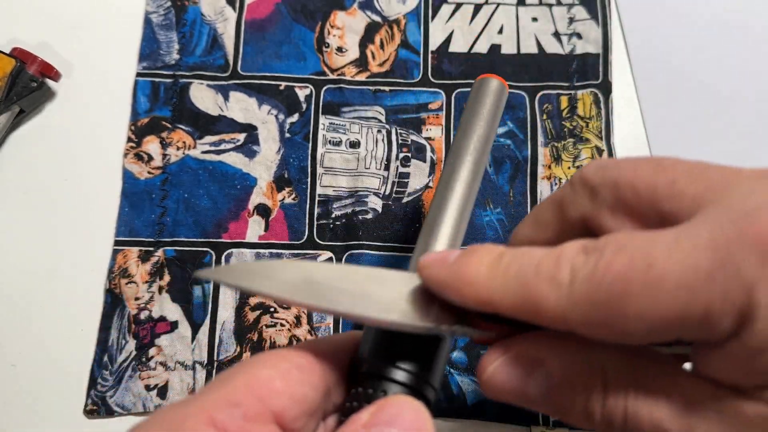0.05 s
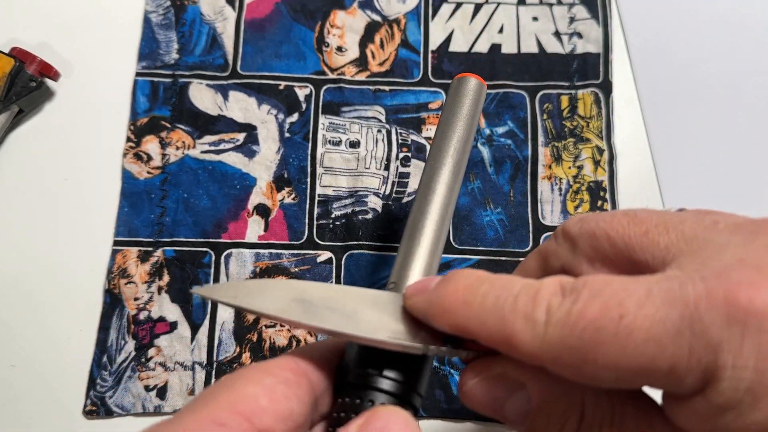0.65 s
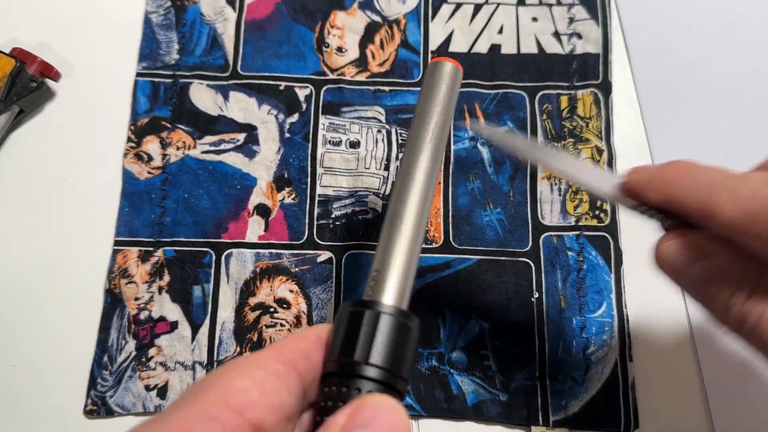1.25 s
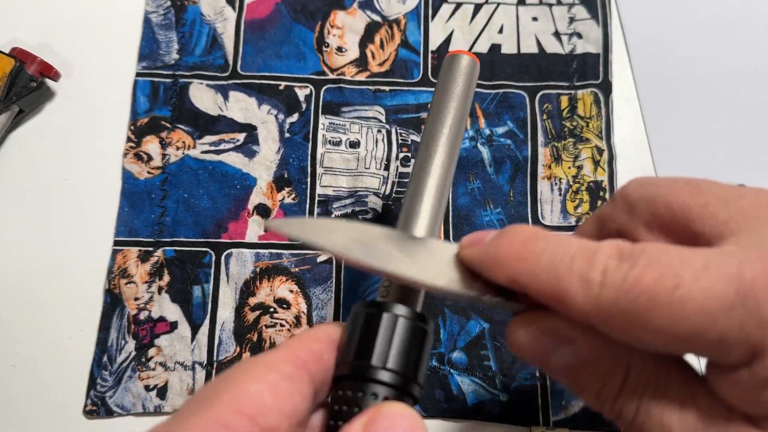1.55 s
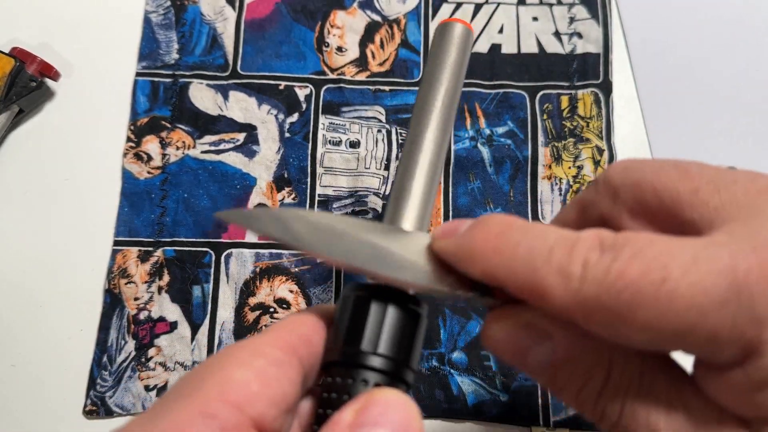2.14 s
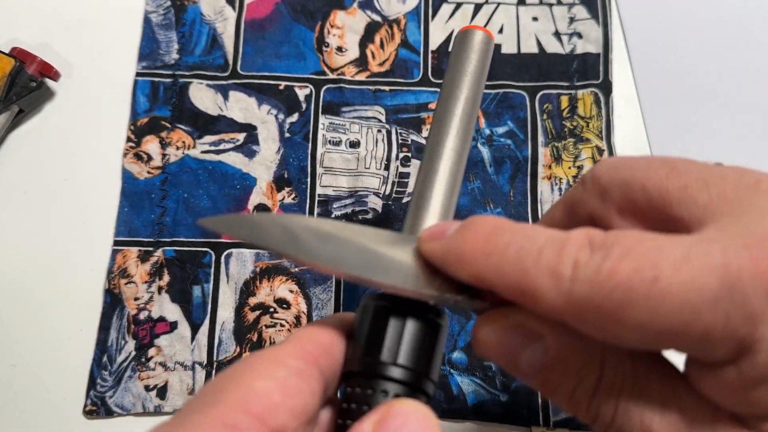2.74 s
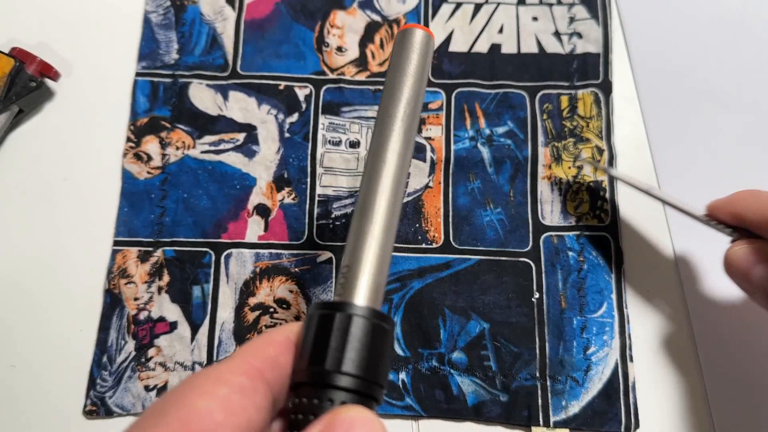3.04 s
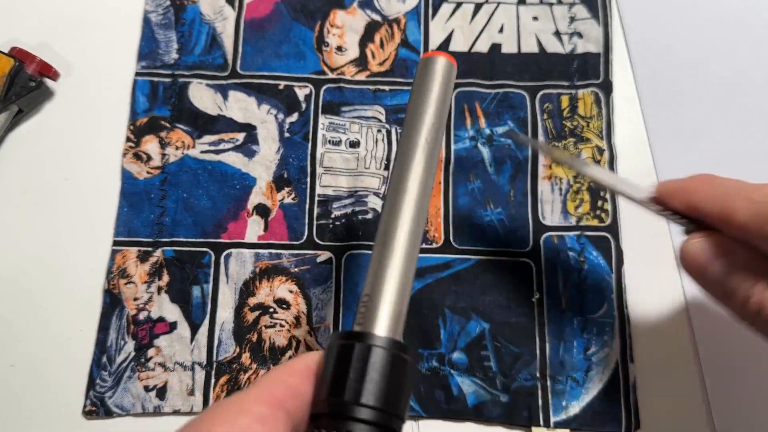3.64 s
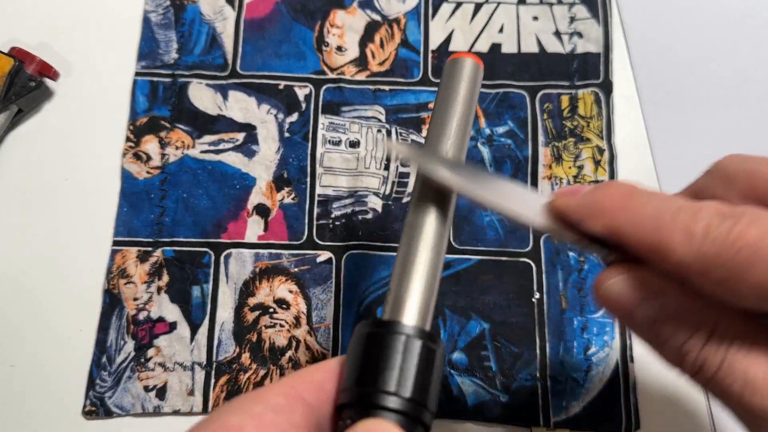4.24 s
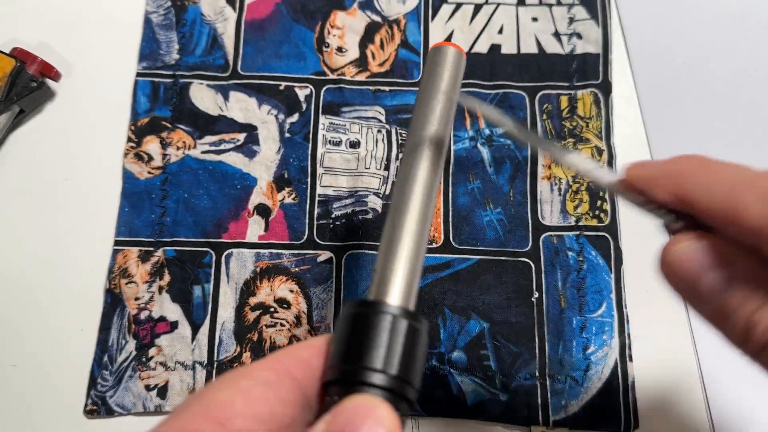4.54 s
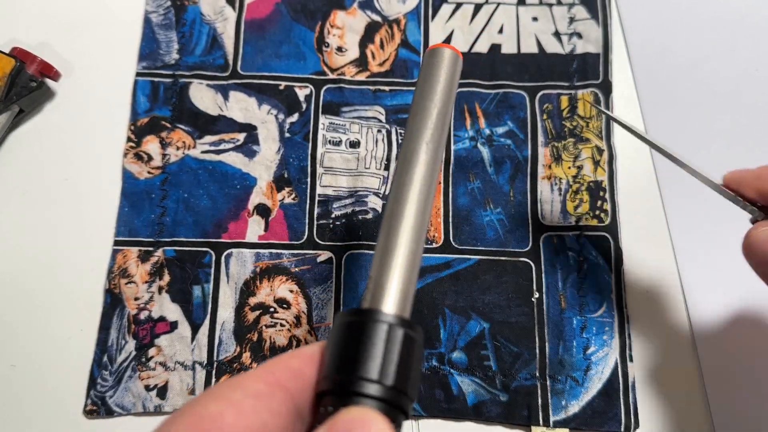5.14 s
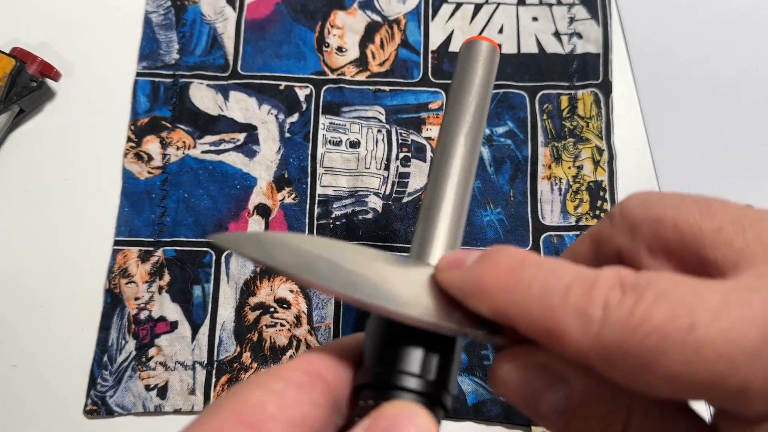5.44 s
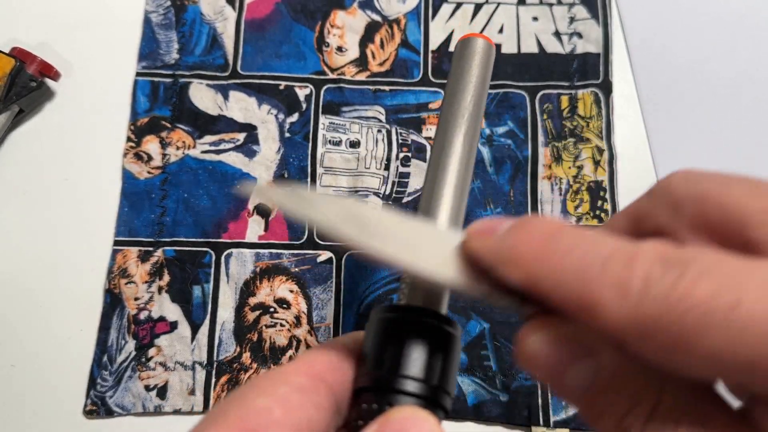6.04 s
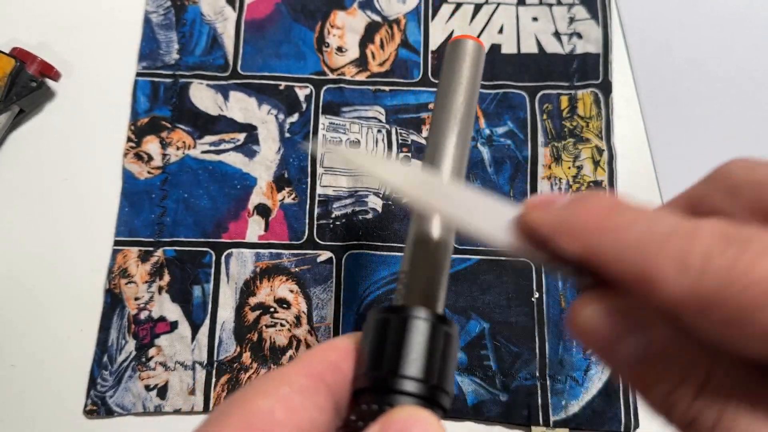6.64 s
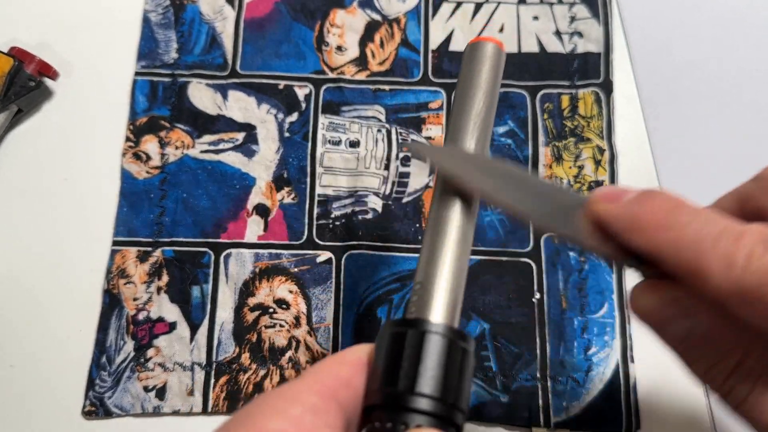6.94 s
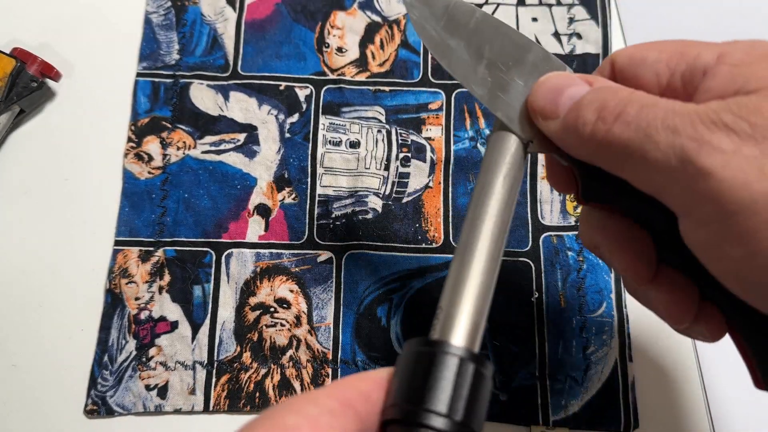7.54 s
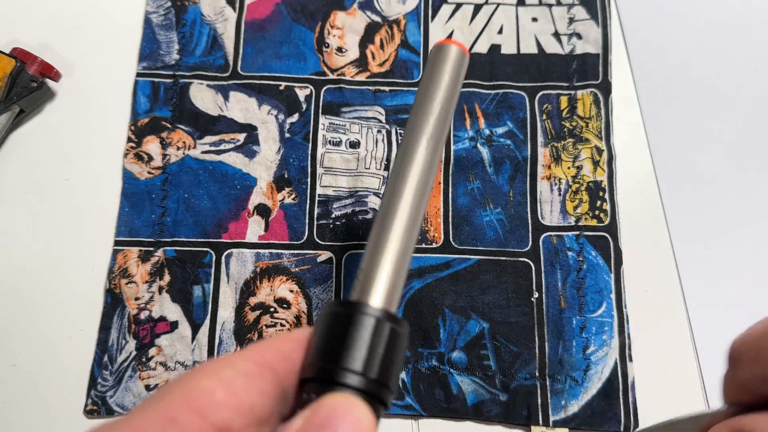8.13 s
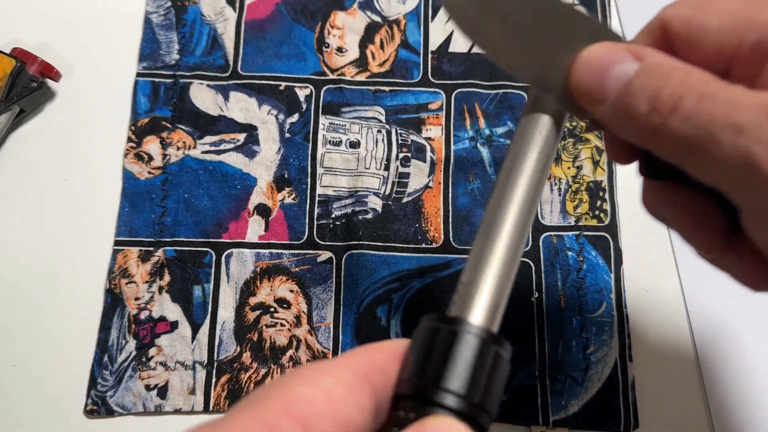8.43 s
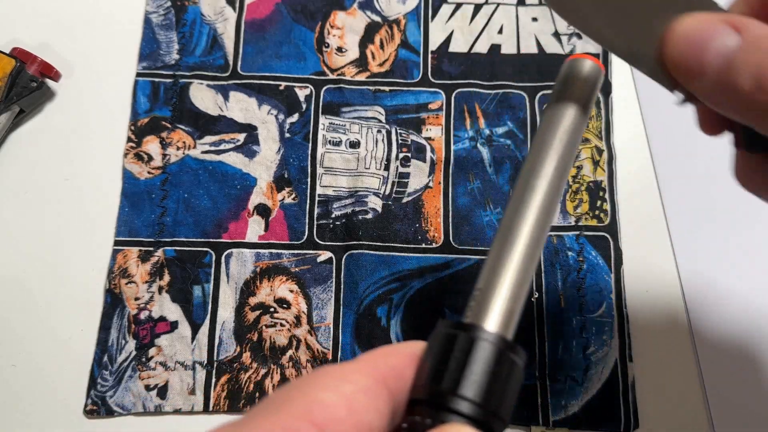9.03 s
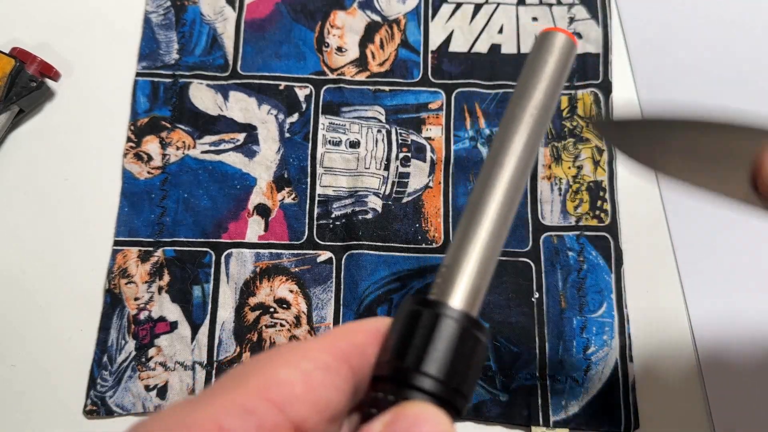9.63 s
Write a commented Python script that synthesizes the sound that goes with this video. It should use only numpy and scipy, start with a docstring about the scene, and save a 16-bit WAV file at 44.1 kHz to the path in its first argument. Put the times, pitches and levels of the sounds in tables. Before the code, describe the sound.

A knife is sharpened on a hand-held diamond rod, heard up close in a small workshop with very little echo. Light steel taps and scuffs sound at about 0.1 and 0.4 seconds. From 0.8 to 7 seconds come ten quick strokes, roughly two thirds of a second apart and each about a quarter of a second long. Each is a dry, gritty rasp that swells and brightens, with shifting metallic tones, ending in a small click and brief ring. Many begin with a tap, the sharpest at 4.7 seconds. At 7.5 seconds the blade lands with a clack and scuffs lightly. Three flatter strokes, slightly louder and hollower in tone, follow at about 7.8, 8.5 and 9.2 seconds, the last ending near 9.5. Throughout, faint sleeve rustle, low handling rumble, electrical hum and quiet room air lie underneath.

```python
"""A knife is sharpened on a hand-held diamond rod, heard up close in a small workshop.
In each stroke the rod's grit rattles the blade, whose ringing tones swell and fade as the contact
slides from heel (the handle end) to tip. Ten strokes use an upright grip, the last three a flatter one.
The blade often lands with a tap or a scuff, and its tip clicks as it leaves the rod.
Underneath are rustling sleeves, the rumble of hands, mains hum and quiet room air."""
import sys
import numpy as np
from scipy import signal
from scipy.fft import rfft, irfft, next_fast_len
from scipy.io import wavfile
from scipy.ndimage import map_coordinates

SR = 44100
rng = np.random.default_rng(int(sys.argv[2]) if len(sys.argv) > 2 else 0)


def wav_out(sig):
    """Save sig, one row per channel (or a flat mono array), as 16-bit PCM at SR to the path in sys.argv[1]."""
    wavfile.write(sys.argv[1], SR, np.round(np.clip(np.atleast_2d(sig).T, -1, 1) * 32767).astype(np.int16))


N = 431298

# The strokes in each grip. Each row: start in seconds, lift-off in seconds, rasp level in dB,
# how much softer it starts in dB, seconds to settle, treble share in dB, last push in dB,
# hand rumble in dB, tip click in dB.
UPRIGHT_STROKES = [ (0.809, 1.099, -35.5, 22, 0.064, -5, 0.5, -73.5, -45),
                   (1.52, 1.72, -34, 23, 0.091, -5, 1, -66, -47),
                   (2.115, 2.344, -34.5, 12, 0.14, -5.5, 4, -64, -48),
                   (2.754, 2.975, -36, 8.5, 0.16, -5.5, 3.5, -64.5, -30),
                   (3.42, 3.637, -35, 17, 0.12, -6, 2, -70, -33),
                   (4.049, 4.3056, -33, 21, 0.2, -5, -3, -58.5, -23),
                   (4.772, 5.018, -35.5, 6.5, .16, -5, 3.5, -59.5, -32),
                   (5.432, 5.713, -36.5, 18, 0.11, -4.5, 4, -60, -35),
                   (6.135, 6.358, -34.5, 21, 0.12, -5, -1, -58.5, -35),
                   (6.749, 7.0025, -30, 17.5, 0.27, -2.5, -3, -63.5, -26), ]
FLAT_STROKES = [ (7.816, 8.0808, -32, 27, 0.13, -6, 0.5, -60, -27),
                (8.495, 8.773, -30, 20.7, 0.11, -5.5, -7.5, -50.5, -32),
                (9.184, 9.473, -31, 18, 0.14, -5, -9, -64.5, -35.5), ]


def strokes(rows, flat, brighten_db, fade_s, tremor_db=0.58, touch_s=0.0047):
    """The edge slides from heel to tip, growing brighter, then lifts and the blade dies away."""
    out = np.zeros(N)
    for row in rows:
        start, end = row[:2]
        t = np.arange(start, end + fade_s, 1 / SR)
        place, db, treble_db = stroke_force(row, t)
        lift_db = 60 * np.maximum(t - end, 0) / fade_s
        pressure = amp(db + tremor_db * wobble(45, len(t)) - lift_db)
        soft_touch = 1 - np.exp(-(t - start) / touch_s)
        rasp = blade(grit(len(t)), place, treble_db + brighten_db * (place - .5), flat)
        add(out, start, soft_touch * pressure * rasp)
    return out


# Moments when the edge bites harder. Each row: time in seconds, extra rasp in dB, treble change in dB.
CATCHES = [(0.988, 6.5, -4.5), (1.616, 2, -9.5), (4.24, 1, -2), (6.94, 2, -1), (8.722, 0.5, 9),
           (9.356, 3.5, 1), (9.414, 0.5, 9)]


def stroke_force(row, t, press_db=5, heel_dullness=0.35, push_s=0.013, catch_s=.013):
    """The edge settles, presses ever harder, may catch, and is pushed or eased at the tip."""
    start, end, db, heel_db, settle_s, treble_db, tip_db, *_ = row
    place = np.clip((t - start) / (end - start), 0, 1)
    unsettled_db = heel_db * np.clip(1 - (t - start) / settle_s, 0, 1) ** 2
    push_db = tip_db * np.exp(-(np.minimum(t - end, 0) / push_s) ** 2)
    db = db - unsettled_db + press_db * (place - .7) + push_db
    treble_db = treble_db - heel_dullness * unsettled_db
    for when, extra_db, extra_treble_db in CATCHES:
        bite = np.exp(-((t - when) / catch_s) ** 2)
        db += extra_db * bite
        treble_db += extra_treble_db * bite
    return place, db, treble_db


def grit(size, spread_db=3.5, chatter_db=0.83):
    """Diamond grains of uneven size strike the edge, in clumps as it chatters."""
    grains = rng.standard_normal(size) * amp(spread_db * rng.standard_normal(size))
    return grains * amp(chatter_db * wobble(420, size))


# The overall colour of the rasp in each grip. Each row: frequency in Hz, relative level in dB.
UPRIGHT_RASP = [(100, -43), (330, -23), (1100, -15), (1700, -2.5), (3000, -0.56), (5000, -1.4), (7500, -1),
                (10200, -4.0), (11600, -14), (12900, -32.5), (14100, -8.5), (15700, -1.5), (16200, -36.5)]
FLAT_RASP = [(100, -48), (330, -35), (1100, -21.5), (1700, -2), (3000, -7), (5000, -5.5), (7500, -6.5),
             (10200, -6.5), (11300, -16), (12900, -30.5), (14100, -11), (15700, 0.5), (16200, -29.5)]
# The blade's ringing tones in each grip. Each row: pitch in Hz, width in Hz, boost or cut in dB,
# place where it is strongest (0 heel, 1 tip), reach along the edge, glide from heel to tip in Hz.
UPRIGHT_TONES = [(740, 190, 15, 0.56, 0.86, 250.5), (1981, 220, 7.5, 0.62, 0.85, -51.5),
                 (2300, 430, 4, 0.93, 0.53, -370.0), (2487, 330, 7.5, 0.35, 0.97, -340.0),
                 (3092, 89, 19.5, 0.98, 0.098, -310.0), (3583, 300, 13, 0.53, 0.13, 78),
                 (3620, 180, 8, 0.73, 0.17, -1760.0), (4104, 560, 8, 0.52, 0.6, 247),
                 (4640, 146, 9, 1, 0.08, 84), (4890, 268, -7, 0.52, 0.82, -180.0),
                 (5640, 350, 7, 0.59, 0.51, -47), (6614, 330, 10, 0.56, 0.36, 311),
                 (8960, 360, 7.5, 1, 0.16, -120.0), (9280, 483, 7, 0.4, 0.36, 1728),
                 (9840, 370, 4.5, 0.9, 0.22, -1400.0)]
FLAT_TONES = [(645, 255, 24.5, 0.21, 1, 101), (1870, 100, 16.5, 0.896, 0.077, -840.0),
              (2320, 303, 16.5, 0.5, 0.56, 91), (2920, 150, 13.5, 0.37, 0.25, 144),
              (3500, 230, 11, 0.566, 0.16, 2522), (4030, 550, 9, 0.62, 0.3, -660.0),
              (4800, 230, -12.5, 0.26, 1, 96), (6400, 1600, 8.5, 0.51, 0.25, 237.5),
              (6940, 120, 12.5, 0.93, 0.041, -1520.0), (8120, 276, 22, 0.58, 0.09, 258),
              (8260, 780, 17, 0.83, 0.097, -26), (9220, 760, 11.5, 0.4, 0.41, 1952)]


def blade(force, place, treble_db, flat=False, echo=0.28, near_s=.0021, far_s=.0031):
    """The shaken blade rings, and its tones shift as the contact moves along the edge."""
    colour, tones = (FLAT_RASP, FLAT_TONES) if flat else (UPRIGHT_RASP, UPRIGHT_TONES)
    frames = dict(fs=SR, nperseg=768, noverlap=576)
    hz, t, spectrum = signal.stft(np.pad(force, (0, 768)), **frames)
    place, treble_db = (np.interp(t * SR, np.arange(len(c)), c) for c in (place, treble_db))
    hz = hz[:, None]
    grip = 1 + 0.0057 * rng.standard_normal()  # the fingers never hold the steel quite alike
    db = along(colour, hz)
    for pitch, width, boost, best_place, reach, glide in tones:
        # the rod pins the blade, so a tone glides as the free length changes
        offset = place - best_place
        db = db + boost * np.exp(-((hz - pitch * grip - glide * offset) / width) ** 2
                                 - (offset / reach) ** 2)
    # many weaker tones come and go as the edge rocks on the rod
    smoothing = np.outer(np.hanning(7), np.hanning(19))
    patches = signal.fftconvolve(rng.standard_normal(spectrum.shape), smoothing, "same")
    db = db + along([(2000, 2.5), (9000, 3.2)], hz) * unit(patches)
    # the echo off the bench comes sooner as the blade moves down the rod
    delay_s = far_s + (near_s - far_s) * place
    gain = amp(db) * abs(1 + echo * np.exp(-2j * np.pi * hz * delay_s))
    # the angle and speed of the edge set the treble's share of the power
    treble_band = 1 / (1 + (7000 / (hz + 1)) ** 8)
    share = np.sum(gain ** 2 * (hz > 7500), 0) / np.sum(gain ** 2, 0)
    wanted = np.clip(amp(treble_db) ** 2, .01, .65)
    gain = gain * (wanted * (1 - share) / (share * (1 - wanted))) ** (treble_band / 2)
    gain /= np.sqrt(np.mean(gain ** 2, 0))
    return unit(signal.istft(spectrum * gain, **frames)[1][:len(force)])


# The blade's landings. Each row: time in seconds, base level in dB, ring pitch in Hz,
# flatness (0 on its edge, 1 on its side).
TAPS = [(0.1054, -17.5, 2510, .25), (0.4466, -20.5, 2310, 0.55), (2.099, -20, 2170, 0),
        (2.7421, -12.5, 2620, .15), (3.4004, -20.5, 2200, 0), (4.0147, -17.5, 2520, .05),
        (4.6699, -34, 2050, 0.79), (4.723, -4.5, 2740, 0.33), (4.7595, -21, 6170, .1),
        (5.4163, -19.5, 2820, 0), (6.07, -43, 2040, 0.99), (6.121, -17.5, 2760, .2),
        (6.734, -15, 2766, .25), (7.5288, -6.5, 2332, 0.95), (8.4756, -16, 2040, 1), (9.1674, -19, 2050, 1)]
# The colours of the sharp crack and the dull knock. Each row: frequency in Hz, relative level in dB.
CRACK = [(300, -30), (1100, -21.5), (1600, -0.5), (2700, 5), (4000, 0.5), (4800, -3), (5700, 4),
         (9000, -3.5), (11000, -15), (12900, -32), (14000, -12), (15600, -13), (16400, -21)]
KNOCK = [(60, -13.5), (250, 2.5), (700, 3), (1100, -1.5), (2500, -22.5)]


def taps(ring_fade_s=0.014, fade_s=0.016, knock_fade_s=0.032, attack_s=0.00045):
    """Steel hits the rod and the handles knock; a flat landing clacks more and cracks less."""
    out = np.zeros(N)
    t = np.arange(SR // 10) / SR
    graze_size = round(.011 * SR)
    for when, db, hz, flatness in TAPS:
        bending = np.sin(2 * np.pi * hz * t) - amp(-7) * np.sin(2 * np.pi * hz * 1.28 * t)
        ring = amp(db - 4 - 60 * t / ring_fade_s) * bending  # the fingers choke it quickly
        clack_hz = 1480 * (1 + 0.046 * rng.standard_normal())
        clack_db = 0.96 * db - 27 + 13 * flatness
        clack = amp(clack_db - 60 * t / fade_s) * np.sin(2 * np.pi * clack_hz * t)
        crack_db = db - 2 - 13 * flatness
        crack = amp(crack_db - 60 * t / fade_s) * noise(CRACK, len(t))
        knock_db = min(db - 19, -39.5)  # the hands cushion hard landings
        knock = amp(knock_db - 60 * t / knock_fade_s) * noise(KNOCK, len(t))
        add(out, when, (ring + clack + crack + knock) * (1 - np.exp(-t / attack_s)))
        # the edge grazes the grit just before it lands
        add(out, when - graze_size / SR, amp(crack_db - 28) * noise(CRACK, graze_size))
    return out


def tip_clicks(rows, ring_hz, ring_db, crack_db, fade_s=0.016, attack_s=0.0011):
    """The tip flicks off the rod at the end of each stroke: a crack and a short ring."""
    out = np.zeros(N)
    t = np.arange(SR // 20) / SR
    for _, end, *_, db in rows:
        click = amp(ring_db) * np.sin(2 * np.pi * ring_hz * t) + amp(crack_db) * noise(CRACK, len(t))
        add(out, end, amp(db - 60 * t / fade_s) * click * (1 - np.exp(-t / attack_s)))
    return out


# The blade's tones as its tip slips free. Each row: pitch in Hz, level in dB, seconds to fade by 60 dB.
TIP_TONES = [(3027, -40.5, .04), (4450, -46.5, .04)]


def tip_rings(swell_s=.022, early_s=.008, blur=0.58):
    """In the upright grip, the last bit of edge sets the blade singing as it leaves the rod."""
    out = np.zeros(N)
    t = np.arange(-swell_s, .1, 1 / SR)
    swell = np.minimum(1 + t / swell_s, 1)
    for _, end, *_ in UPRIGHT_STROKES:
        for hz, db, fade_s in TIP_TONES:
            pitch = hz * (1 + 0.0034 * rng.standard_normal())
            tone = unit(np.sin(2 * np.pi * pitch * t + blur * wobble(140, len(t))))
            add(out, end - early_s - swell_s, amp(db - 60 * np.maximum(t, 0) / fade_s) * swell * tone)
    return out


# Light scrapes. Each row: start in seconds, end in seconds, first level in dB, last level in dB.
SCUFFS = [(0.128, 0.319, -67, -63), (0.395, 0.447, -55, -34.5), (0.455, 0.502, -48, -53.5),
          (0.695, 0.724, -69, -55), (0.745, 0.761, -66, -52.5), (1.382, 1.441, -39.5, -43.5),
          (2.719, 2.724, -56, -54.5), (3.933, 3.998, -48.5, -56.5), (4.729, 4.771, -42, -35),
          (7.539, 7.606, -55.5, -58.5), (7.687, 7.751, -67, -58.5), (7.763, 7.786, -46.5, -41.5)]


def scuffs(place=0.16, treble_db=-9, ramp_s=0.0013):
    """The edge scrapes coarsely near the heel while it is set on the rod."""
    out = np.zeros(N)
    for start, end, first_db, last_db in SCUFFS:
        t = np.arange(0, max(end - start, .01), 1 / SR)
        steady = np.ones(len(t))
        rasp = blade(grit(len(t), chatter_db=1.5), place * steady, treble_db * steady)
        soft_ends = np.minimum(np.minimum(t, t[-1] - t) / ramp_s, 1)
        add(out, start, rasp * amp(np.linspace(first_db, last_db, len(t))) * soft_ends)
    return out


# How long the room rings. Each row: frequency in Hz, seconds to fade by 60 dB.
ROOM_FADE = [(200, 0.14), (2500, 0.17), (8000, 0.18), (15000, 0.12)]


def room_echo(x, gap_s=.006):
    """The workshop answers with a short wash of echoes."""
    hz, t, spectrum = signal.stft(rng.standard_normal(SR // 2), SR, nperseg=256)
    fade = amp(-60 * t / along(ROOM_FADE, hz)[:, None])
    tail = signal.istft(spectrum * fade, SR, nperseg=256)[1]
    tail = np.pad(tail / np.linalg.norm(tail), (round(gap_s * SR), 0))
    return signal.fftconvolve(x, tail)[:N]


# How much the sleeves rustle. Each row: time in seconds, base level in dB.
SLEEVES = [(0.0, -67), (0.57, -76), (2.97, -63.5), (3.13, -72), (5.58, -59.5), (5.91, -71.5), (6.29, -63),
           (6.45, -72), (8.72, -66), (8.85, -76), (9.12, -82.5), (9.31, -62.5), (9.48, -73), (9.78, -81)]
# The colours of sleeve rustle and hand rumble. Each row: frequency in Hz, relative level in dB.
RUSTLE = [(100, -14), (190, -2), (270, 0), (430, -8), (700, -15), (1300, -22), (2500, -23), (5000, -32),
          (12000, -50)]
RUMBLE = [(15, -30), (30, -15), (45, -1.5), (75, -5), (110, 1), (170, -10.5), (350, -35.5), (1000, -73.5)]


def hands_and_sleeves(swell_db=3.5, flutter_db=2, rest_db=-67.0):
    """Moving sleeves rustle and hands rumble, swelling in the middle of each stroke."""
    t = np.arange(N) / SR
    motion, rumble = np.zeros(N), np.full(N, amp(rest_db))
    for start, end, *_, rumble_db, _ in UPRIGHT_STROKES + FLAT_STROKES:
        swell = np.exp(-((t - (start + end) / 2) / (0.41 * (end - start))) ** 2)
        motion += swell
        rumble += amp(rumble_db) * swell
    rustle_db = np.interp(t, *np.transpose(SLEEVES)) + swell_db * motion + flutter_db * wobble(25, N)
    return amp(rustle_db) * noise(RUSTLE, N) + rumble * noise(RUMBLE, N)


# The tones of the hum. Each row: pitch in Hz, level in dB.
HUM_TONES = [(49.5, -69), (119.7, -62.5), (195, -74), (247, -77.5), (293, -81)]


def mains_hum(drift_db=0.7, waver=0.22):
    """An appliance on mains power hums a little unsteadily."""
    t = np.arange(N) / SR
    out = np.zeros(N)
    for hz, db in HUM_TONES:
        level = amp(db + drift_db * wobble(3.8, N))
        out += level * unit(np.sin(2 * np.pi * hz * t + waver * wobble(2.6, N)))
    return out


# The colour of the room's air. Each row: frequency in Hz, relative level in dB.
AIR = [(30, 0), (150, 0), (300, -5), (500, -14), (1200, -23), (2400, -20), (3500, -26), (9000, -31),
       (11500, -41), (13000, -50), (15500, -41)]


def room_air(db=-71):
    """The air in the room makes a faint, low hush."""
    return amp(db) * noise(AIR, N)


def amp(db):
    """Turn decibels into a gain."""
    return 10 ** (np.asarray(db) / 20)


def unit(x):
    """Scale x to an average power of 1."""
    return x / np.sqrt(np.mean(x ** 2) + 1e-20)


def along(points, hz):
    """Read between (Hz, value) points on a log frequency scale."""
    known_hz, values = np.transpose(points)
    return np.interp(np.log(hz + 1), np.log(known_hz), values)


def wobble(rate, size):
    """A smooth curve through `rate` random points a second."""
    points = rng.standard_normal(int(size * rate / SR) + 4)
    return map_coordinates(points, [np.arange(size) * rate / SR])


def filtered(x, gain):
    """Turn each frequency of x up or down by gain(hz)."""
    size = next_fast_len(len(x) + 4096)
    return irfft(rfft(x, size) * gain(np.fft.rfftfreq(size, 1 / SR)), size)[:len(x)]


def noise(colour, size):
    """Noise of the given colour, with an average power of 1."""
    return unit(filtered(rng.standard_normal(size), lambda hz: amp(along(colour, hz))))


def add(track, start, x):
    """Mix x into the track at `start` seconds."""
    part = track[round(start * SR):][:len(x)]
    part += x[:len(part)]


def scene():
    """Knife and rod in the workshop, over the quiet background."""
    upright = strokes(UPRIGHT_STROKES, flat=False, brighten_db=4.5, fade_s=0.055)
    flat = strokes(FLAT_STROKES, flat=True, brighten_db=3.5, fade_s=0.05)
    clicks = tip_clicks(UPRIGHT_STROKES, ring_hz=3040, ring_db=4.5, crack_db=2.5)
    clicks += tip_clicks(FLAT_STROKES, ring_hz=6800, ring_db=12, crack_db=-0.5)
    steel = upright + flat + clicks + tip_rings() + scuffs() + taps()
    return (steel + amp(-13.5) * room_echo(steel) + hands_and_sleeves() + mains_hum() + room_air())[None]


def record(dry):
    """Cut away the treble above 16000 Hz."""
    return filtered(dry[0], lambda hz: 1 / np.sqrt(1 + (hz / 16000) ** 200))[None]


dry = scene()
out = record(dry)
wav_out(out)
```